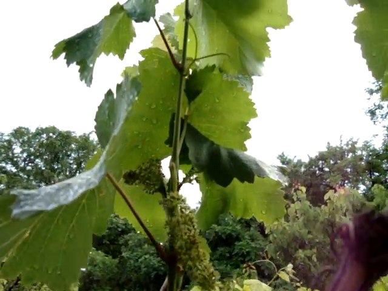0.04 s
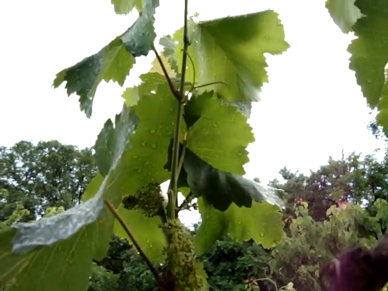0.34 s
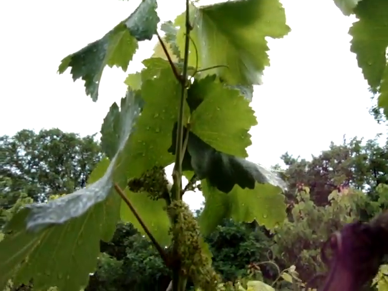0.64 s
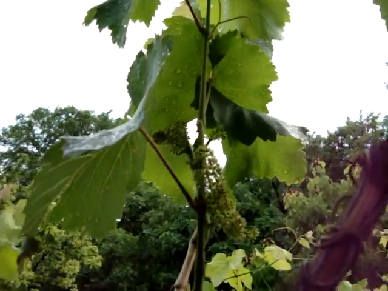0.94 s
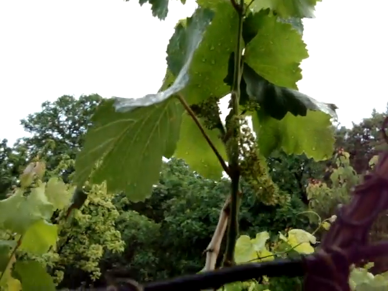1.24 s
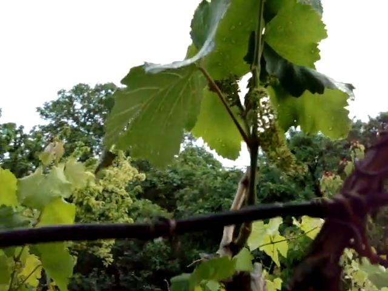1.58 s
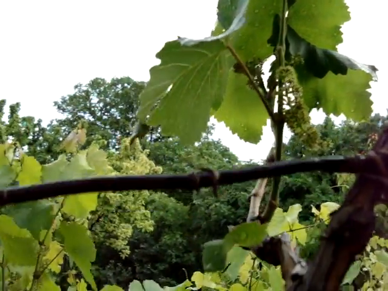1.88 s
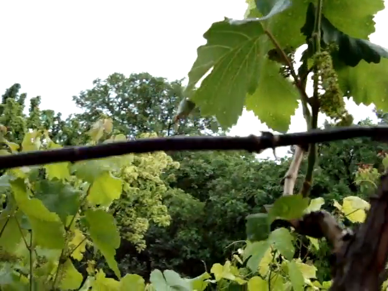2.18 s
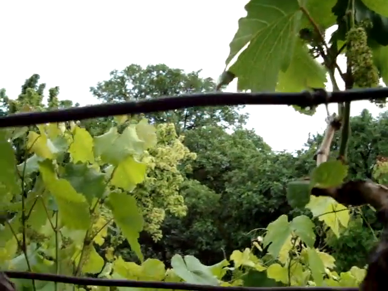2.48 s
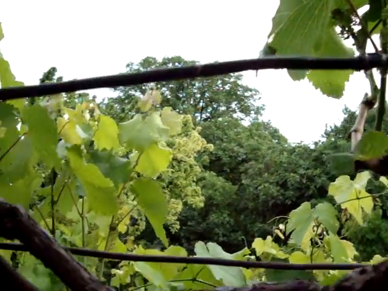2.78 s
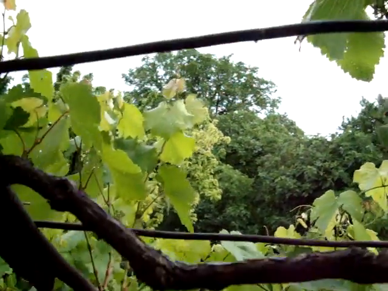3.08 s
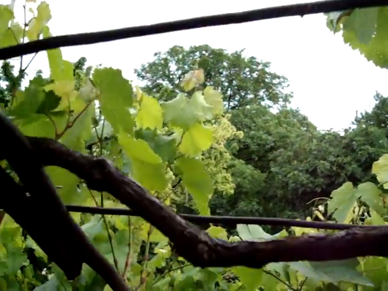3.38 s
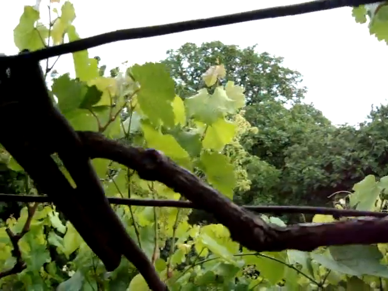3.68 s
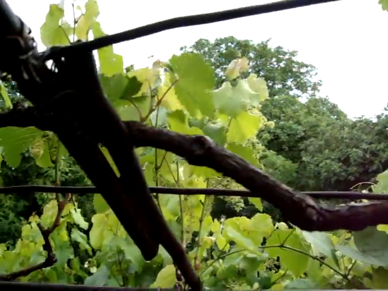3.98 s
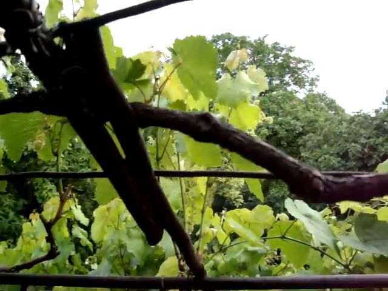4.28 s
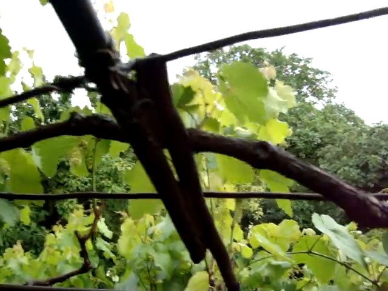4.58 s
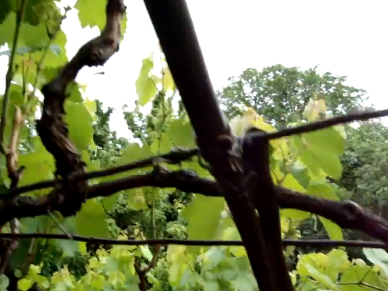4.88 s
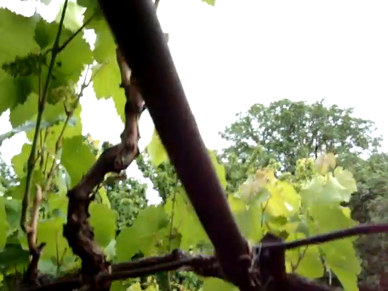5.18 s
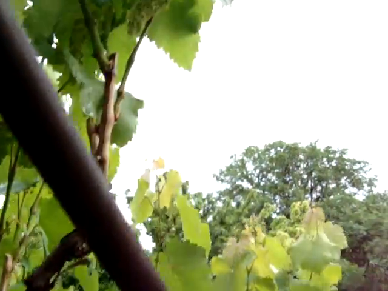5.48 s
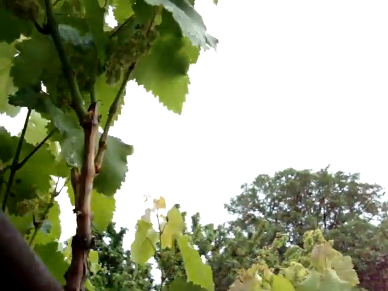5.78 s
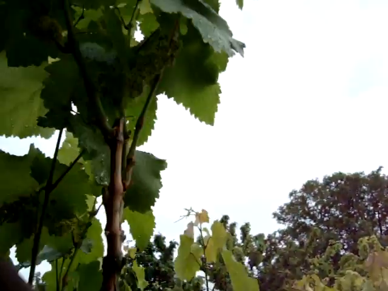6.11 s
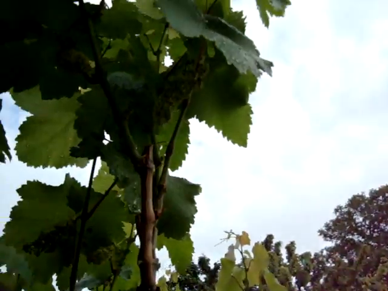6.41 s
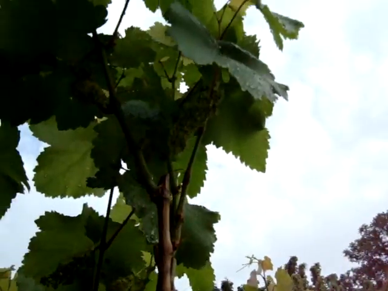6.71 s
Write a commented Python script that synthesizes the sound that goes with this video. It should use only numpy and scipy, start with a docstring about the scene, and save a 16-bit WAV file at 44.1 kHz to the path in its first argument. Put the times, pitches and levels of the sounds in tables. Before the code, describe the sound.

A faint, steady hush of leaves and distant town fills a garden throughout. Far off, a hoopoe gives soft, low hoots in twos and threes, at the start and again near 2, 3 and 5 seconds. Small birds chirp faintly, and another distant bird makes a short falling buzz at 1 second, repeating it several times from 3.3 seconds on. A closer nightingale gives three held, high whistles on one pitch at about 2.7, 3.3 and 4 seconds, each swelling and louder than the last. At 4.5 seconds it sings a bright slurred note, then two lower double clucks. From 5 to 5.9 seconds comes the loudest part: four rapid, sharp chirps, a short lower note and two see-sawing pairs. A quieter, very high, brief trill closes the phrase at 6 seconds, leaving the distant buzzes and hush. Trees give the song a short, soft echo.

```python
"""Nightingale in a leafy garden

A nightingale's syrinx gives near-pure tones: three swelling whistles, then a quick, loud phrase of
slurs, tucks and two-voiced notes. Trees scatter the song into a short wash of echoes. Further off,
a hoopoe hoots, small birds chirp and another bird repeats a falling buzz, over a steady hush."""
import sys
import numpy as np
from scipy import signal
from scipy.fft import rfft, irfft
from scipy.io import wavfile
from scipy.ndimage import uniform_filter1d

SR = 44100
rng = np.random.default_rng(int(sys.argv[2]) if len(sys.argv) > 2 else 0)


def int16_out(signal):
    """Quantize to a 16-bit WAV file."""
    q = np.round(np.clip(np.atleast_2d(signal).T, -1, 1) * 32767)
    wavfile.write(sys.argv[1], SR, q.astype(np.int16))


N = 302085

# syllables, one pitch arc under one swell, by name:
# length/s, first/Hz, turning/Hz, last/Hz, turn at/s, bend (1 = straight), peak at/s, swell/dB, fade/dB
SYLLABLES = { "tuck": (0.047, 2570, 1475, 1465, 0.0398, 5.2, .003, 5, 15.5),
             "rise": (0.028, 4230, 5293, 9900, 0.027, 1.45, .012, 30, 4.1),
             "drop": (0.019, 3350, 4170, 2330, 0.0091, 1.55, 0.008, 15, 3.9),
             "swell": (.085, 1240, 2040, 1300, .061, 1.05, .063, 26, 17.5),
             "arch": (.046, 2280, 3060, 1970, 0.0202, 1.05, 0.0187, 11, 12.1),
             "lift": (0.0397, 4700, 3790, 4910, 0.0098, 2.1, 0.0089, 15, 5.7),
             "lisp": (.027, 6820, 6640, 5750, .003, 1.62, .017, 10.3, 4),
             "whit": (.08, 3760, 3450, 1910, .015, 0.96, .015, 1.5, 3),
             "tick": (.035, 3100, 2300, 2000, .018, 1.05, 0.017, 1.5, 8),
             "pipe": (.085, 2467, 2440, 2400, 0.036, 0.97, 0.04, 7.6, 10)}
# decay among the trees: f/Hz, t60/s
TREE_DECAY = [(500, 0.92), (1800, 0.58), (3000, 0.59), (4200, 0.54), (5500, 0.58), (8000, 0.49)]
ATTACK_S, RELEASE_S = 0.003, 0.0028


def amp(db):
    """Decibels to gain."""
    return 10 ** (np.asarray(db) / 20)


def unit(x):
    """Scale to rms 1."""
    return x / np.sqrt(np.mean(x ** 2) + 1e-20)


def curve_at(points, hz):
    """Interpolate on a log frequency axis."""
    f, value = np.transpose(points)
    return np.interp(np.log(hz + 1), np.log(f + 1), value)


def add(mix, at_s, sound):
    """Mix a sound in at a time."""
    part = mix[max(round(at_s * SR), 0):][:len(sound)]
    part += sound[:len(part)]


def wander(size, rate_hz):
    """Smooth random motion up to a rate."""
    hz = np.fft.rfftfreq(SR, 1 / SR)
    spectrum = rfft(rng.standard_normal(SR)) / (1 + (hz / rate_hz) ** 4)
    return np.resize(unit(irfft(spectrum, SR)), size)


def swell(t, peak_s, swell_db, fade_db):
    """Note envelope: quick attack, swell, fade, quick release."""
    db = np.interp(t, [0, peak_s, t[-1]], [-swell_db, 0, -fade_db])
    return amp(db) * np.clip(np.minimum(t / ATTACK_S, (t[-1] - t) / RELEASE_S), 0, 1)


def syllable(name):
    """Pitch and envelope of a syllable; the pitch glides to a turning point, then on to its end."""
    length_s, first_hz, turn_hz, last_hz, turn_s, bend, peak_s, swell_db, fade_db = SYLLABLES[name]
    t = np.arange(0, length_s, 1 / SR)
    away = np.interp(t, [0, turn_s, length_s], [1, 0, 1]) ** bend
    hz = turn_hz + (np.where(t < turn_s, first_hz, last_hz) - turn_hz) * away
    return hz, swell(t, peak_s, swell_db, fade_db)


def syrinx(hz, envelope, jitter, octave_db):
    """Near-pure tone with a faint octave; the pitch trembles by the rms fraction jitter."""
    phase = 2 * np.pi * np.cumsum(hz * (1 + jitter * wander(len(hz), rate_hz=250))) / SR
    return np.sqrt(2) * envelope * (np.sin(phase) + amp(octave_db) * np.sin(2 * phase))


def scatter(x, decay, delay_s, build_s):
    """Dense foliage echoes build up, then die band by band (decay: f/Hz, t60/s)."""
    hz, t, noise = signal.stft(rng.standard_normal(SR), SR, nperseg=256)
    tail = signal.istft(noise * amp(-60 * t / curve_at(decay, hz)[:, None]), SR, nperseg=256)[1]
    tail *= 1 - np.exp(-np.maximum(np.arange(len(tail)) / SR - delay_s, 0) / build_s)
    return signal.fftconvolve(x, tail / np.linalg.norm(tail))[:N]


def garden(x, echo_db, bush_db, tree_db, bush_t60_s=0.26):
    """Direct sound, single reflections, a quick wash from bushes and a longer one from trees."""
    # ground, leaf and trellis reflections: delay/s, relative level/dB
    echoes = [(.0031, -28), (.00755, -13.5), (.01175, -10), (0.0172, -18), (.027, -16.5), (0.046, -24),
              (.065, -28.5)]
    out = x.copy()
    for delay_s, db in echoes:
        add(out, delay_s, amp(db + echo_db) * x)
    out += amp(bush_db) * scatter(x, [(3000, bush_t60_s)], delay_s=0.0032, build_s=0.0012)
    return out + amp(tree_db) * scatter(x, TREE_DECAY, delay_s=0.025, build_s=0.026)


def hush(level_db=-53.5, patch_db=1.06, swell_db=2.5, swell_at_s=5.53, swell_s=0.69):
    """Distant town and leaves: smooth noise with slight drifting patches and one gentle swell."""
    # noise spectrum: f/Hz, relative density/dB
    spectrum = [(15, -74), (25, -36.5), (118, -21), (168, -16.5), (277, -14), (414, -12.5), (458, -13),
                (574, -9.5), (634, -13.5), (1130, -17.5), (2720, -24), (3760, -23), (4060, -24),
                (8820, -30.5), (10000, -32.5), (13000, -73.5), (22000, -120)]
    hz, _, noise = signal.stft(rng.standard_normal(N), SR, nperseg=2048, noverlap=1536)
    patches = uniform_filter1d(rng.standard_normal(noise.shape), size=14, axis=0)
    patches = unit(uniform_filter1d(patches, size=12, axis=1))
    shaped = noise * amp(curve_at(spectrum, hz)[:, None] + patch_db * patches)
    air = signal.istft(shaped, SR, nperseg=2048, noverlap=1536)[1][:N]
    rise = np.exp(-((np.arange(N) / SR - swell_at_s) / swell_s) ** 2)
    return unit(air) * amp(level_db + swell_db * rise)


def hoopoe(length_s=0.105, period_s=0.192, rise_hz=22):
    """Far, soft, low hoots, mostly in twos and threes, each bending upward."""
    # hoot series: t/s, count, f/Hz, level/dB
    series = [(.04, 2, 579, -47.5), (1.12, 2, 592, -62), (1.92, 3, 572.4, -53.5), (2.58, 1, 540.4, -54),
              (2.66, 1, 571, -54), (2.72, 1, 472, -49.5), (2.88, 2, 579, -55.5), (4.46, 2, 561.7, -56.5),
              (4.80, 3, 581.6, -46.5), (6.5, 2, 555, -61)]
    step_hz, step_rise_hz, step_db = 4.9, 16.5, 0.6  # per hoot: higher, steeper, louder
    out = np.zeros(N)
    along = np.linspace(0, 1, int(length_s * SR))
    for at_s, count, base_hz, db in series:
        for k in range(round(count)):
            hz = base_hz + k * step_hz + (rise_hz + k * step_rise_hz) * (along - 0.5)
            envelope = np.sin(np.pi * along) * amp(db + k * step_db)
            add(out, at_s + k * period_s, syrinx(hz, envelope, jitter=0.01, octave_db=-40.5))
    return garden(out, echo_db=-8.5, bush_db=-5, tree_db=-13)


def small_birds():
    """Faint chirps in the trees, half hidden in their echoes."""
    # chirps: t/s, syllable, pitch factor, level/dB, pitch jitter (fraction)
    chirps = [(.40, "whit", 1.02, -55.5, .05), (.47, "pipe", 1.6, -57.5, 0.035),
              (1.305, "tick", 1.03, -55.5, .022), (1.484, "pipe", 1, -51.5, .0035),
              (1.55, "pipe", .81, -62, 0.043), (2.315, "whit", 1.02, -53, 0.053),
              (2.33, "pipe", 1.56, -61, 0.033), (2.48, "tick", 1.14, -60, .013),
              (2.91, "tick", .96, -57, .012), (2.99, "pipe", 1.66, -51.5, .045),
              (3.46, "pipe", 0.85, -56.5, 0.073), (4.40, "pipe", 1.72, -54.5, 0.015)]
    out = np.zeros(N)
    for at_s, name, factor, db, jitter in chirps:
        hz, envelope = syllable(name)
        add(out, at_s, syrinx(hz * factor, envelope * amp(db), jitter, octave_db=-47.5))
    return garden(out, echo_db=-13.5, bush_db=-4, tree_db=-5.5)


def buzzing_bird(flutter_hz=120, flutter_depth=0.086):
    """Far, falling rasp from a fast, wide pitch flutter, heard only by way of the foliage."""
    # calls: t/s, level/dB
    calls = [(1.011, -43), (3.257, -43.5), (3.874, -44), (4.61, -43.5), (6.009, -43.5), (6.53, -45.5)]
    # three gliding strands per call: delay/s, length/s, first/Hz, last/Hz, relative level/dB
    strands = [(0, .16, 5795, 5010, -4.5), (0.039, .195, 4076, 3797, 0.7), (.06, .16, 3200, 2792, -10)]
    out = np.zeros(N)
    for at_s, db in calls:
        for delay_s, length_s, first_hz, last_hz, strand_db in strands:
            t = np.arange(0, length_s, 1 / SR)
            cycles = np.cumsum(flutter_hz * (1 + 0.148 * wander(len(t), rate_hz=40.8))) / SR
            flutter = 1 + flutter_depth * np.sin(2 * np.pi * cycles)
            hz = np.geomspace(first_hz, last_hz, len(t)) * flutter
            envelope = amp(db + strand_db) * swell(t, peak_s=0.61 * length_s, swell_db=9, fade_db=12)
            add(out, at_s + delay_s, syrinx(hz, envelope, jitter=0.08, octave_db=-23))
    bushes = amp(1.5) * scatter(out, [(3000, 0.25)], delay_s=0.00091, build_s=0.0015)
    return bushes + amp(-4) * scatter(out, TREE_DECAY, delay_s=0.025, build_s=0.026)


def whistles(attack_s=0.045, swell_db=15, fade_db=17, dip_s=0.014, waver_db=0.9, hiss_db=-23):
    """Three swelling nightingale whistles, each louder, with one pitch sway and a brief level dip."""
    # whistles: t/s, length/s, f/Hz, sway/Hz, sway lateness (1 = even), level/dB, fade/s, dip at/s, dip/dB
    notes = [(2.676, 0.4, 2905, -7.5, 0.74, -39, 0.079, 2.94, 3.5),
             (3.258, 0.53, 2943, 36.5, .95, -34.5, 0.22, 3.43, 10),
             (3.965, .48, 2932, -27.5, 1.225, -26.5, 0.079, 4.28, 13.5)]
    # faint hiss that swells along: f/Hz, relative density/dB
    hiss_spectrum = [(2000, -40.5), (2350, -17), (2500, 4.5), (2800, -2.5), (3100, -9.5), (3500, -5),
                     (3800, -28.5), (4400, -44)]
    hiss_gain = amp(curve_at(hiss_spectrum, np.fft.rfftfreq(N, 1 / SR)))
    noise = unit(irfft(rfft(rng.standard_normal(N)) * hiss_gain, N))
    out = np.zeros(N)
    for at_s, length_s, centre_hz, sway_hz, lateness, db, fade_s, dip_at_s, dip_db in notes:
        t = np.arange(0, length_s, 1 / SR)
        hz = centre_hz + sway_hz * np.sin(2 * np.pi * (t / length_s) ** lateness)
        peak_s = length_s - fade_s
        shape_db = -swell_db * (np.maximum(peak_s - t, 0) / peak_s) ** 1.32  # levels off near the peak
        shape_db -= fade_db * (np.maximum(t - peak_s, 0) / fade_s) ** 1.2
        shape_db -= dip_db * np.exp(-((at_s + t - dip_at_s) / dip_s) ** 2)
        shape_db += waver_db * wander(len(t), rate_hz=30)
        gate = np.clip(np.minimum(t / attack_s, (length_s - t) / RELEASE_S), 0, 1)
        envelope = amp(db + shape_db) * gate
        hiss = amp(hiss_db) * envelope * noise[round(at_s * SR):][:len(t)]
        add(out, at_s, syrinx(hz, envelope, jitter=0.0057, octave_db=-42) + hiss)
    return garden(out, echo_db=-2.5, bush_db=-13, tree_db=-15.5)


def slur(length_s=0.132, held_hz=3744, level_db=-20.5):
    """Pitch and envelope of a note that scoops up, overshoots, holds and falls away."""
    scoop_hz, scoop_s = 1306, 0.003
    overshoot_hz, overshoot_at_s, overshoot_s = 696, 0.0093, 0.0099
    fall_hz_per_s, fall_s = 35000, 0.033
    t = np.arange(0, length_s, 1 / SR)
    scoop = scoop_hz * np.exp(-t / scoop_s)
    overshoot = overshoot_hz * np.exp(-((t - overshoot_at_s) / overshoot_s) ** 2)
    fall = fall_hz_per_s * np.maximum(t - length_s + fall_s, 0)
    envelope = amp(level_db) * swell(t, peak_s=0.12, swell_db=3.5, fade_db=8.5)
    return held_hz - scoop + overshoot - fall, envelope


def phrase(slur_at_s=4.497, brightening_db_per_octave=13):
    """The nightingale's slur, then quick, loud sweeps; the overtone grows with pitch."""
    # song: t/s, figure, pitch factor, level/dB
    song = [(4.681, "chuck", 1.01, -30), (4.881, "chuck", 1.04, -28.5), (5.056, "twit", 1.02, -15.5),
            (5.153, "twit", 1.026, -15.5), (5.253, "twit", 1.018, -15.5), (5.351, "twit", .99, -16),
            (5.473, "purl", .995, -25), (5.633, "see-saw", 1.008, -14), (5.803, "see-saw", 1.02, -14)]
    # figures, one syllable or a quick pair, by name: delay/s, syllable, relative level/dB
    figures = { "chuck": [(0, "tuck", -0.5), (.0645, "tuck", 0.5)], "twit": [(0, "rise", -4.5),
               (.0275, "drop", 0)], "purl": [(0.0033, "swell", 0.5)], "see-saw": [(0, "arch", 0),
               (.061, "lift", -3)]}
    notes = [(slur_at_s, *slur())]
    for at_s, figure, factor, db in song:
        for delay_s, name, part_db in figures[figure]:
            hz, envelope = syllable(name)
            notes.append((at_s + delay_s, hz * factor, envelope * amp(db + part_db)))
    out = np.zeros(N)
    for at_s, hz, envelope in notes:
        octave_db = -36 + brightening_db_per_octave * np.log2(hz / 4000)
        add(out, at_s, syrinx(hz, envelope, jitter=0.014, octave_db=octave_db))
    return garden(out, echo_db=1, bush_db=-5, tree_db=-15)


def trill(upper_ratio=1.183, upper_db=-3):
    """Four closing downstrokes from both sides of the syrinx; so high a sound scatters little."""
    # downstrokes: t/s, pitch factor, level/dB
    strokes = [(5.975, 1., -34), (6.008, 1.006, -34), (6.043, 1.01, -32), (6.079, 1.01, -33.5)]
    out = np.zeros(N)
    hz, envelope = syllable("lisp")
    for at_s, factor, db in strokes:
        for ratio, side_db in ((1, 0), (upper_ratio, upper_db)):
            voice = syrinx(hz * factor * ratio, envelope * amp(db + side_db), jitter=0.025, octave_db=-46)
            add(out, at_s, voice)
    return garden(out, echo_db=-8.5, bush_db=-17, tree_db=-18.5, bush_t60_s=0.03)


def scene():
    """All birds over the hush, mono."""
    nightingale = whistles() + phrase() + trill()
    return (nightingale + small_birds() + buzzing_bird() + hoopoe() + hush())[None]


def record(dry):
    """Soft clip of the loudest peaks, then a low-pass."""
    ceiling, cutoff_hz = 0.39, 10200
    rounded = dry / (1 + (dry / ceiling) ** 20) ** (1 / 20)
    lowpass = signal.firwin(801, cutoff_hz, window=("kaiser", 9), fs=SR)
    return signal.oaconvolve(rounded, lowpass[None], "same")


dry = scene()
out = record(dry)
int16_out(out)
```